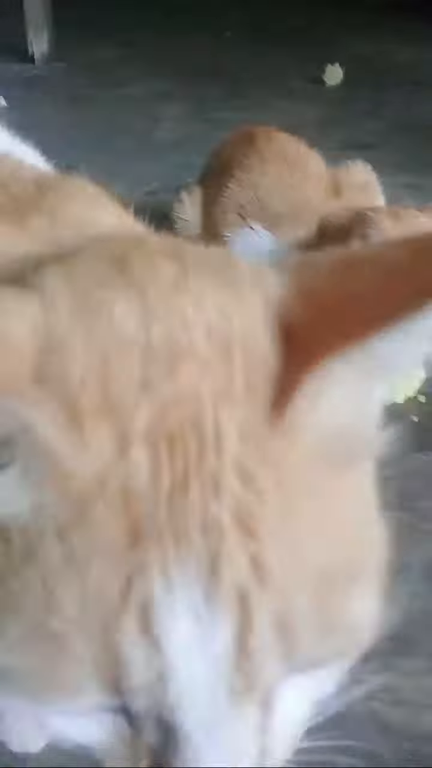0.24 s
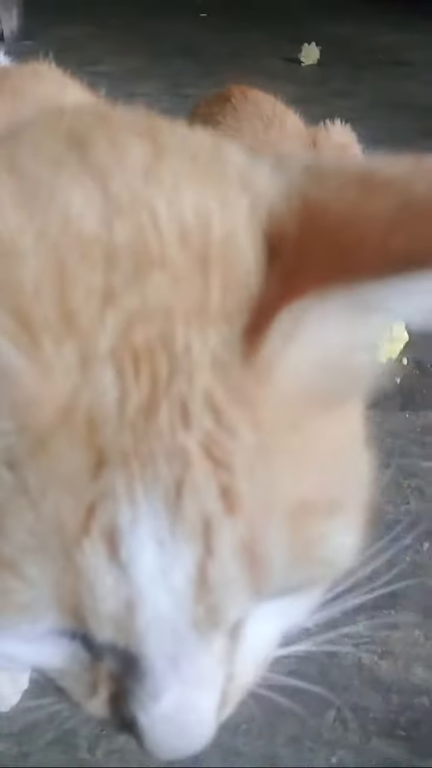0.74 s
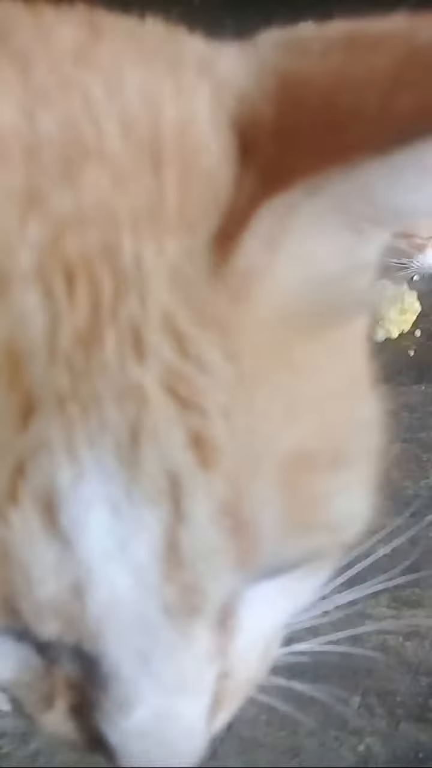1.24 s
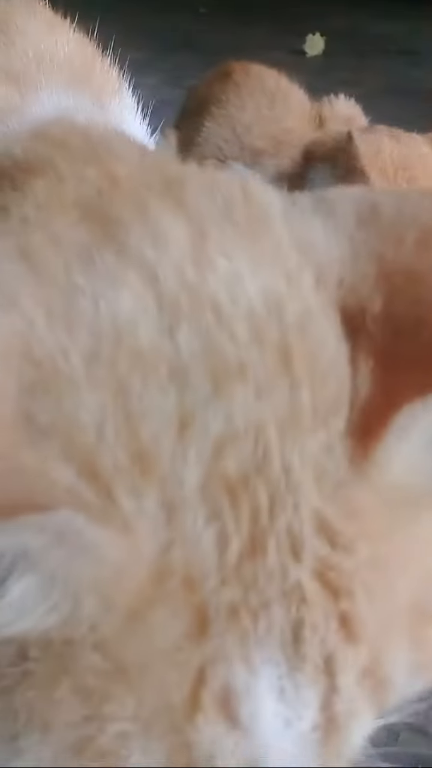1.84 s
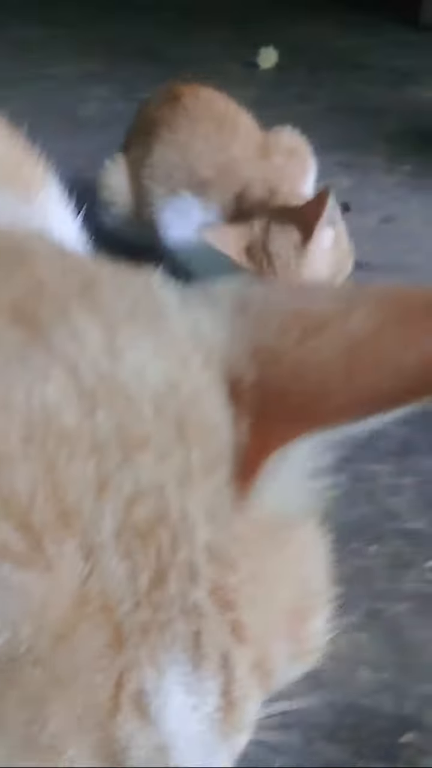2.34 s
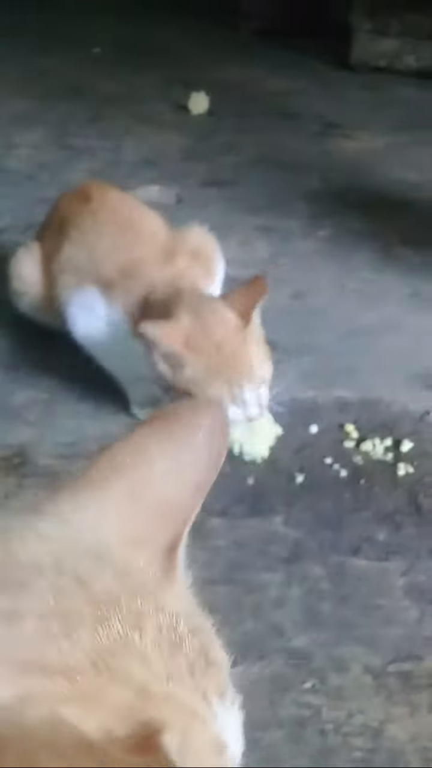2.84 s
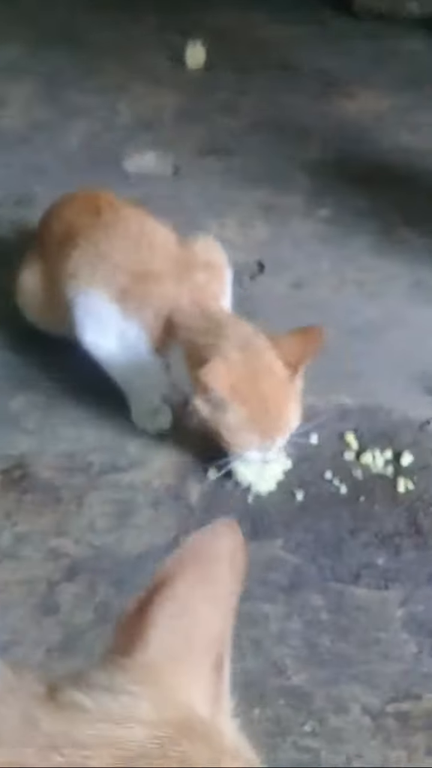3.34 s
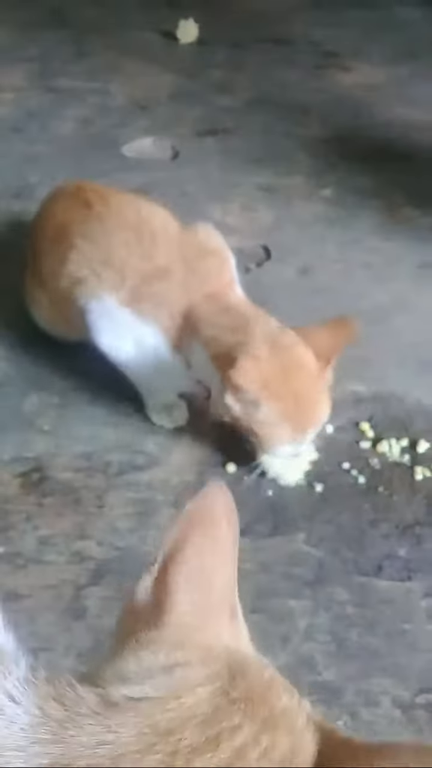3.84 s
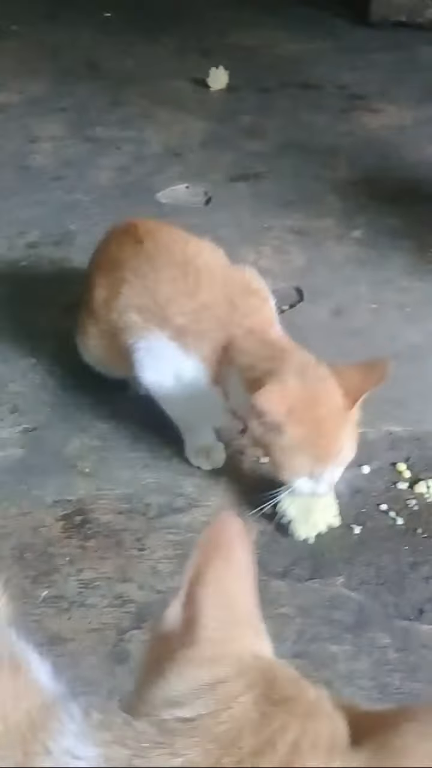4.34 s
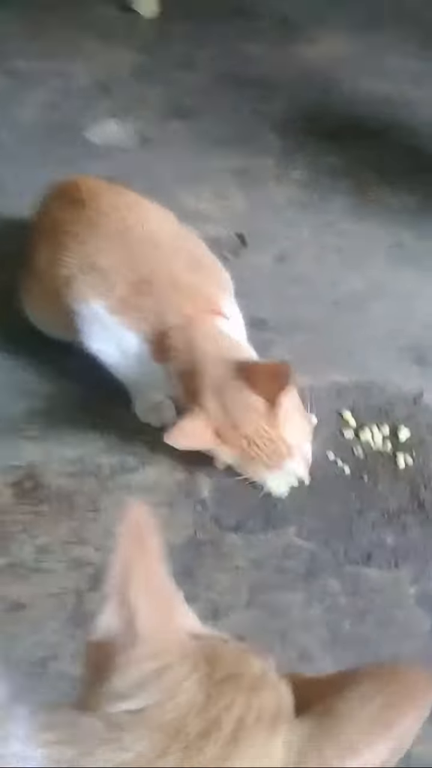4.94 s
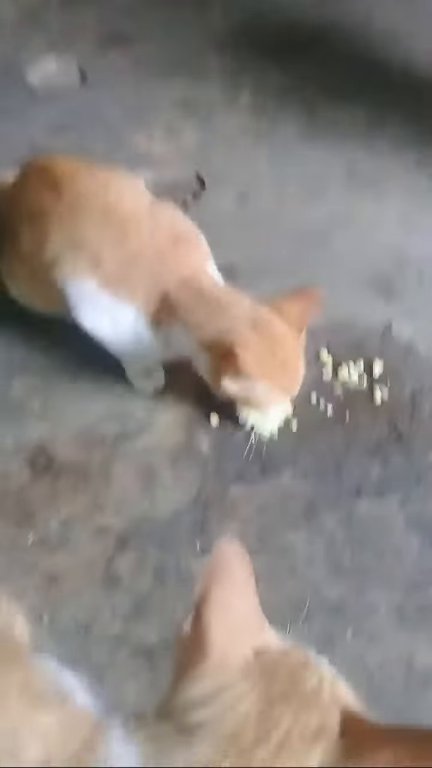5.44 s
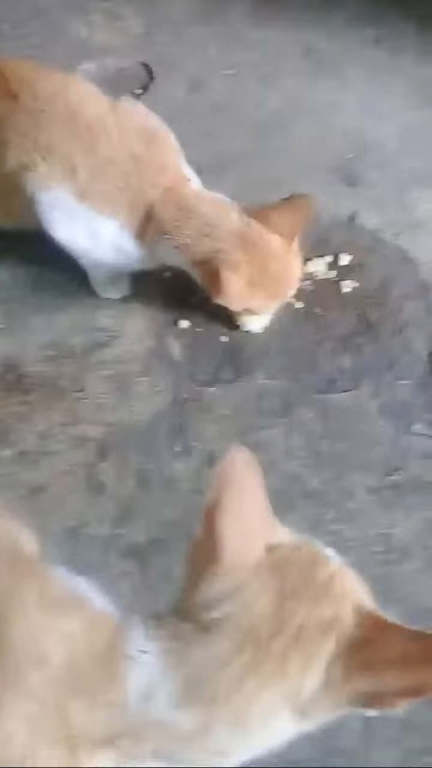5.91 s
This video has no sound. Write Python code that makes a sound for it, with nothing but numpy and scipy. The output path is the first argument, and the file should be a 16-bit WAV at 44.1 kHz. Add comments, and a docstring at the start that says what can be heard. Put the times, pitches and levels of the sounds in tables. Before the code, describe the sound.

A cat very close by gives one long, low, closed-mouth growl that slowly climbs, roughens and turns into a deep ragged snarl, with tiny clicks.

```python
"""A cat's growl, long, low and very close, is aimed at another cat that eats on a concrete floor.
Periodic fold beats and their partials make a closed-mouth hum that climbs in pitch and turns ragged.
Shaped turbulence adds rasp and wheezes; short decaying bursts make a lip smack, clicks and faint chewing.
Strokes of filtered noise make a brush of fur, over a quiet steady hiss and a low rumble."""
import sys
import numpy as np
from scipy import signal
from scipy.fft import rfft, irfft, next_fast_len
from scipy.io import wavfile
from scipy.ndimage import map_coordinates

SR = 44100
rng = np.random.default_rng(int(sys.argv[2]) if len(sys.argv) > 2 else 0)


def waveform_to_disk(signal):
    """Save audio, clipped to [-1, 1], as 16-bit WAV at the path in sys.argv[1]."""
    frames = np.transpose(np.atleast_2d(signal))
    scaled = np.clip(frames, -1, 1) * 32767
    samples = np.round(scaled).astype(np.int16)
    wavfile.write(sys.argv[1], SR, samples)


N = 272097  # length in samples

# pitch of the strongest partial, twice the beat of the vocal folds: [t/s, f/Hz]
HUM_PITCH = [(0, 97), (.12, 96.1), (.65, 110.4), (.98, 113), (1.16, 116.6), (1.84, 123), (2.5, 126.5),
             (3.09, 128.3), (3.4, 123.8), (3.6, 124.6), (3.8, 122), (4.0, 128), (4.2, 129), (4.5, 121.5),
             (4.7, 125.5), (4.95, 126.5), (5.05, 130.6), (5.57, 132), (5.9, 133.5), (6.17, 131.5)]
# the hum swells and eases with the push of the chest: [t/s, level/dB before catches and shimmer]
HUM_LEVEL = [(0, -35), (.12, -31.5), (.26, -37.5), (1.04, -37.8), (1.11, -31.5), (1.18, -29), (1.36, -33.5),
             (1.63, -30), (1.73, -33.5), (2.16, -39), (2.28, -32), (2.92, -35), (3.19, -29.5),
             (3.35, -33.5), (3.44, -31.5), (3.65, -35), (3.8, -33.5), (3.92, -38), (4.1, -34),
             (4.22, -36.5), (4.54, -36), (4.7, -30.5), (4.92, -34.5), (5.04, -28), (5.15, -31.5),
             (5.37, -25.5), (5.57, -31), (5.7, -31), (5.8, -36), (6.17, -35.5)]
# the voice catches, so the hum dips and turns ragged: [t/s, depth/dB, half length/s]
CATCHES = [(.375, 3, .025), (.525, 9, .018), (1.955, 3, .025), (2.539, 5, .032), (4.449, 10, .025),
           (4.843, 9, .04), (5.612, 8, .015), (5.667, 15, .018), (5.735, 9, .015)]
# the growl presses ever harder: [t/s, rasp level/dB, throat rattle reference level/dB, fold beat level/dB]
EFFORT = [(.09, -72, -52.5, -66), (.43, -75.5, -54, -69), (.95, -73, -48.5, -65), (1.18, -71.5, -52, -60),
          (1.75, -66.8, -49, -61.5), (2.04, -68.5, -47, -67), (2.33, -68, -50, -63),
          (2.46, -63.5, -47.5, -53.5), (2.75, -63, -49.5, -58), (2.99, -59.5, -48.5, -64),
          (3.52, -60, -48, -61.5), (4.2, -55.5, -45.5, -56), (4.59, -54.3, -46, -52),
          (5.0, -50.8, -41.7, -52), (5.44, -49.3, -41, -55), (5.9, -46.5, -41.5, -42.5),
          (6.15, -44.3, -41.5, -41)]
SMOOTH_DB, ROUGH_PER_DB = -30.5, 0.02  # a weaker hum than this gets rougher, by so much per dB
# roughness 0-1: at the least, gained by the end, added by the deep voice
ROUGH_BASE, ROUGH_GROWS, ROUGH_DEEP = 0.027, .16, 0.08
OVERTONES_DB, RATTLE_NOISE_DB = 1.2, -2.0  # relative to the throat rattle reference


def growl():
    """Self-sustained oscillation: slack folds beat about 60 times a second, strongest in partial two."""
    progress, _, deep = growl_controls()
    pitch, = curves(HUM_PITCH)
    _, rattle_db, beat_db = curves(EFFORT)
    catch_db = sum(db * swell(s, half) for s, db, half in CATCHES)
    hum_db = curves(HUM_LEVEL)[0] - catch_db
    weakness_db = np.maximum(SMOOTH_DB - hum_db, 0)
    rough = ROUGH_BASE + ROUGH_GROWS * progress + ROUGH_DEEP * deep + ROUGH_PER_DB * weakness_db
    rough = np.clip(rough, .01, 1)
    cycles = np.cumsum(pitch / 2) / SR
    phase = 2 * np.pi * cycles  # of the fold beat
    wander = WANDER + WANDER_PER_ROUGH * rough
    voiced = amp(hum_db) * hum(phase, rough) + amp(beat_db) * fold_beat(phase, deep)
    throat = amp(OVERTONES_DB) * overtones(phase, wander) + amp(RATTLE_NOISE_DB) * rattle(cycles, rough)
    return voiced + singing(phase, wander) + amp(rattle_db + 1.3 * wobble(25)) * throat


# the mouth parts slowly, then wide: [t/s, opening 0-1]
MOUTH_OPENING = [(2.0, 0), (2.9, .07), (3.2, .13), (3.75, .2), (4.3, .2), (4.62, .1), (4.9, .35),
                 (5.25, .62), (5.6, .78), (6.05, .86), (6.16, 1)]
DEEP_S, DEEP_FADE_S = 5.62, .06  # late on the voice breaks into a deep, ragged growl: when, how fast


def growl_controls():
    """Slow control of the source: progress, mouth opening and share of the deep voice, each 0-1."""
    t = np.arange(N) / SR
    opening = np.clip(curves(MOUTH_OPENING)[0], 0, 1)
    deep = .5 + .5 * np.tanh((t - DEEP_S) / (2 * DEEP_FADE_S))
    return t / t[-1], opening, deep


# the throat damps the lowest flutter: [f/Hz, level/dB]
FLUTTER_COLOUR = [(40, -28), (72, -14), (93, 2), (112, 1.5), (142, -3), (158, .5), (220, -3)]
SHIMMER_DB, SHIMMER_PER_S = 1.15, 20  # the hum's strength trembles, more in a rough voice: depth, rate


def hum(phase, rough):
    """Modulation sidebands: alternating strong and weak beats make the second partial flutter."""
    limp = phase / 2 + 1.2 * wobble(6)  # beats pair up, roughly
    flutter = 0.65 * np.sin(2 * phase - limp) + 0.32 * np.sin(2 * phase + limp)
    flutter = flutter + .9 * wobble(65) * np.cos(2 * phase)
    flutter = coloured(flutter, FLUTTER_COLOUR)
    shimmer_db = SHIMMER_DB * unit(rough) * wobble(SHIMMER_PER_S)
    tone = (np.sin(2 * phase) + rough * flutter) / np.sqrt(1 + rough ** 2)
    return np.sqrt(2) * amp(shimmer_db) * tone


# share of the fold beat that comes and goes until the deep voice locks in; how fast
BEAT_LOOSE, BEAT_STUTTER_PER_S = .55, 15


def fold_beat(phase, deep):
    """Partial coherence: the fundamental mixes a steady sine with one of random amplitude and phase."""
    loose = np.clip(BEAT_LOOSE * (1 - deep), .02, 1)
    stutter = wobble(BEAT_STUTTER_PER_S) * np.sin(phase) + wobble(BEAT_STUTTER_PER_S) * np.cos(phase)
    return np.sqrt(2 * (1 - loose)) * np.sin(phase) + np.sqrt(loose) * stutter


# uneven folds put some partials between the harmonics: [multiple of the beat, level/dB before OVERTONES_DB]
OVERTONES = [(2.5, -12), (3, -8.5), (3.5, -15), (4, -12), (4.26, -8.5), (5, -14), (6, -18), (6.8, -23)]
WANDER, WANDER_PER_ROUGH = .45, 2.4  # phase wander of the overtones (radians), wider in a rough voice


def overtones(phase, wander):
    """Inharmonic partials: uneven vibration makes each waver in level and phase."""
    return sum(amp(db + 3 * wobble(9)) * np.sin(k * phase + wander * wobble(15)) for k, db in OVERTONES)


# single overtones sing out of the rattle: [t/s, half length/s, multiple of the beat, level/dB]
OVERTONE_SWELLS = [(.2, .09, 4.1, -54), (.86, .06, 3.05, -52), (1.0, .14, 4.1, -50), (1.45, .25, 4.05, -54),
                   (2.0, .28, 3, -49.5), (2.27, .08, 5.1, -52), (2.48, .04, 5.3, -51),
                   (2.88, .36, 4.27, -51), (3.5, .12, 3, -52), (3.75, .12, 4.2, -51),
                   (4.18, .12, 4.27, -48), (5.08, .13, 3, -47), (5.15, .18, 6, -55), (5.38, .13, 4.24, -47),
                   (5.72, .14, 4.3, -50), (5.95, .17, 3.04, -47), (5.97, .12, 3.55, -47)]


def singing(phase, wander):
    """Selective reinforcement: single partials swell and fade, with less phase wander."""
    out = np.zeros(N)
    for s, half, k, db in OVERTONE_SWELLS:
        out += amp(db) * swell(s, half) * np.sin(k * phase + .55 * wander * wobble(9))
    return np.sqrt(2) * out


# resonant colour of the throat: [f/Hz, level/dB]
THROAT = [(70, -43), (140, -9), (165, 1), (190, 2.5), (255, 0), (300, -5.5), (350, -7), (430, -17),
          (510, -16), (620, -30.5), (900, -42), (2000, -60)]


def rattle(cycles, rough):
    """Source and filter: fold closings and turbulent air both excite the throat."""
    pulses = unit(fold_pulses(cycles, rough, jitter=.0022, scatter_db=1.5))
    return unit(0.8 * unit(coloured(pulses, THROAT)) + noise(THROAT))


def fold_pulses(cycles, rough, jitter, scatter_db):
    """Jitter and shimmer: one pulse per closing, uneven in time (seconds) and size."""
    at = np.flatnonzero(np.diff(np.floor(cycles)) > 0)
    late, size = rng.standard_normal((1024, 2))[:len(at)].T
    when = at + late * jitter * SR * np.sqrt(rough[at])
    when = np.clip(when, 0, N - 1).astype(int)
    return np.bincount(when, amp(scatter_db * size), N)


# colour of the air with the mouth shut: [f/Hz, level/dB]
MOUTH_SHUT = [(250, -21.5), (450, 8), (620, 5.5), (780, 7), (950, -.5), (1100, -1), (1300, -3), (1600, 3),
              (1900, 1.5), (2150, -5.5), (2600, -15.5), (3200, -36), (4500, -39.5), (8000, -49)]
# colour of the air with the mouth open: [f/Hz, level/dB]
MOUTH_OPEN = [(200, -9), (330, 11.5), (440, 8.5), (610, -2), (790, 1), (1000, 1), (1230, -0.5), (1600, 1.5),
              (1950, 3.5), (2200, -5.5), (3050, -9), (3600, -16.5), (4400, -23), (5500, -36.5), (8000, -50)]
# narrow resonances that colour the rasp: [f/Hz, width/Hz, lift/dB]
RASP_RINGS = [(431, 28, 4), (505, 30, 5), (680, 40, 3), (788, 26, 4.5), (1214, 45, 2.5), (1587, 70, 2.5),
              (1929, 30, 3.5)]
# air hisses past the cat's teeth: [f/Hz, level/dB]
SPIT = [(1200, -25), (2600, 0), (3300, -1), (4400, -5), (5500, -16), (9000, -30)]
SPIT_DB, SPIT_POWER = -16, 11  # under the rasp with the mouth wide open; how steeply it grows


def rasp():
    """Turbulence through resonances: air tears through the throat, brighter as the mouth opens."""
    _, opening, _ = growl_controls()
    air = np.sqrt(1 - opening) * noise(MOUTH_SHUT) + np.sqrt(opening) * noise(MOUTH_OPEN)
    hz = np.geomspace(200, 4000, 600)
    lift_db = sum(db / (1 + (2 * (hz - centre) / width) ** 2) for centre, width, db in RASP_RINGS)
    air = unit(coloured(air, np.column_stack([hz, lift_db])))
    air = air + amp(SPIT_DB) * opening ** SPIT_POWER * noise(SPIT)
    return amp(curves(EFFORT)[0] + 0.8 * wobble(11.0) + 1.3 * wobble(130)) * air


# the tight throat whistles or hisses: [t/s, half length/s, f/Hz, phase wobble rate/(1/s), level/dB]
WHEEZES = [(1.26, .11, 500, 12, -61.5), (1.92, .09, 1750, 450, -72.5), (2.92, .04, 490, 110, -54),
           (3.16, .06, 1800, 400, -63), (5.84, .04, 840, 90, -53), (5.95, .15, 436, 25, -52)]


def wheezes():
    """Resonance of a narrow passage: a brief tone, spread into a hiss by fast phase wobble."""
    t, out = np.arange(N) / SR, np.zeros(N)
    for s, half, hz, rate, db in WHEEZES:
        tone = np.sqrt(2) * np.sin(2 * np.pi * hz * t + 1.1 * wobble(rate))
        out += amp(db) * swell(s, half) * tone
    return out


# a quick run of ticks: [t/s, peak level/dB]
SMACK_TICKS = [(.8332, -49.5), (.8375, -60), (.8462, -53.5), (.858, -57.5), (.8662, -59.5), (.875, -64),
               (.882, -66)]
# colour of the wet mouth: [f/Hz, level/dB]
SMACK_COLOUR = [(900, -32), (1700, -13), (2100, -5), (2550, -4), (2850, 3), (3100, -5), (3450, -20),
                (3900, -12), (4400, -27), (6000, -38), (10000, -50)]


def smack():
    """Impulse response of the mouth: wet lips part in a fading run of crackling ticks."""
    out, t = np.zeros(N), np.arange(SR // 10) / SR
    for s, db in SMACK_TICKS:
        blow = (t == 0) + .08 * rng.standard_normal(len(t)) * amp(-60 * t / .016)
        tick = coloured(blow, SMACK_COLOUR)
        add(out, s, amp(db) * tick / np.abs(tick).max())
    return out


# sharp clicks close by: [t/s, peak level/dB, knock level/dB relative to the snap, t60/s]
CLICKS = [(4.1762, -22.8, -11, 0.002), (4.1825, -41, -9, .014), (4.7706, -27.5, 6, 0.005),
          (4.7736, -25.5, 6, 0.005), (4.7748, -35, -2, .005)]
# colour of the sharp snap: [f/Hz, level/dB]
SNAP = [(500, -28), (1500, -8.5), (1950, -6), (2300, 4), (2600, 2), (2900, -2), (3450, 1.5), (3850, -2),
        (4500, -1), (5300, -17), (6200, -4.5), (7200, -22), (8700, -29.5), (11200, -9.5), (12500, -22.5),
        (15500, -28.5)]
# colour of the duller body knock: [f/Hz, level/dB]
KNOCK = [(200, -4), (550, -5), (900, 3), (1800, -0.5), (2300, -9), (4500, -20), (7200, -24.5),
         (9300, -18.5), (15500, -30)]


def clicks():
    """Impact excitation: an impulse with a short crackle drives a sharp snap and a duller knock."""
    out, t = np.zeros(N), np.arange(SR // 10) / SR
    for s, db, knock_db, t60 in CLICKS:
        blow = (t == 0) + .09 * rng.standard_normal(len(t)) * amp(-60 * t / t60)
        click = unit(coloured(blow, SNAP)) + amp(knock_db) * unit(coloured(blow, KNOCK))
        add(out, s, amp(db) * click / np.abs(click).max())
    return out


# chewing, crumbs and small mouth noises: [t/s, onset level/dB, centre f/Hz, width/octaves, t60/s]
CHEWS = [(.055, -77, 4000, .2, .25), (.834, -66, 3950, .07, .04), (.836, -70, 2700, .22, .38),
         (1.248, -75, 3000, .5, .08), (2.528, -50, 1800, .13, .04), (2.528, -66, 3500, .45, .02),
         (2.53, -73.5, 3500, .52, .38), (2.535, -71, 7200, .27, .24), (2.618, -57, 1450, .25, .14),
         (2.875, -51, 1890, .14, .03), (2.882, -53, 620, .6, .3), (3.431, -71, 4500, .7, .097),
         (3.705, -68.5, 5200, .55, .039), (3.76, -74, 4800, .45, .049), (4.025, -76, 10000, .25, .15),
         (4.805, -64.5, 4200, .22, .3), (6.012, -71, 5440, .22, .17)]


def chewing():
    """Band-limited decay: soft food gives small bursts of crackle, each in its own band."""
    out, t = np.zeros(N), np.arange(SR // 4) / SR
    # [widths from the centre, level/dB]
    skirt = [(-6, -55), (-3, -22), (-1, -7), (0, 0), (1, -8), (3, -26), (6, -60)]
    for s, db, hz, width, t60 in CHEWS:
        grains = rng.standard_normal(len(t)) * amp(3.8 * rng.standard_normal(len(t)))
        band = [(hz * 2 ** (k * width), level) for k, level in skirt]
        add(out, s, amp(db - 60 * t / t60) * unit(coloured(grains, band)))
    return out


# fur brushes close by: [t/s, level/dB, rise/s, fade t60/s, brightness/(dB per octave)]
STROKES = [(4.8, -66, .06, 1.0, 0), (5.025, -68, .02, .6, 2), (5.13, -64.5, .11, 1.2, -1.5),
           (5.22, -70, .05, .7, 0), (5.42, -65.5, .05, 1.3, 3)]
# colour of rubbed fur before the brightness tilt: [f/Hz, level/dB]
HAIRS = [(1500, -13), (3000, 3), (4400, -1.5), (5400, -2.5), (6200, -8), (7300, -10), (9000, -6.5),
         (11000, -8), (15500, -14)]


def fur():
    """Friction noise: fur rubs by in overlapping strokes of soft hiss, each with its own brightness."""
    t, out = np.arange(N) / SR, np.zeros(N)
    for s, db, rise, t60, tilt_db in STROKES:
        fade = amp(db - 60 * np.maximum(t - s, 0) / t60)
        envelope = fade * np.where(t < s, swell(s, rise), 1)
        hairs = [(hz, level + tilt_db * np.log2(hz / HAIRS[0][0])) for hz, level in HAIRS]
        out += envelope * noise(hairs)
    return out * amp(.6 * wobble(45))


# decay of the room: [f/Hz, t60/s]
ROOM = [(100, 0.24), (2000, 0.22), (6000, .13), (12000, 0.18)]


def room(x):
    """Diffuse reverberation: floor and walls answer with noise that decays at its own rate per band."""
    hz, t, z = signal.stft(rng.standard_normal(SR // 2), SR, nperseg=256)
    decay = amp(-60 * t / along(ROOM, hz)[:, None])
    tail = signal.istft(z * decay, SR, nperseg=256)[1]
    return signal.fftconvolve(x, tail / np.linalg.norm(tail))[:N]


# colour of the steady hiss: [f/Hz, level/dB]
FLOOR = [(1650, -34), (2800, -6), (3420, -6), (5300, -2), (5730, -4), (7680, -4), (8310, -2.5), (10500, -1),
         (15500, -0.5)]


def hiss():
    """Stationary noise: a steady, mostly treble background."""
    return amp(-76) * noise(FLOOR)


def rumble():
    """Stationary noise: a steady background weighted to the bass."""
    colour = [(20, -10), (60, -5.5), (300, -17), (600, -25), (1100, -21.5), (3000, -26.5), (8000, -65)]
    return amp(-75.5) * noise(colour)


def amp(db):
    """Logarithmic level: decibels to gain."""
    return 10 ** (np.asarray(db) / 20)


def unit(x):
    """Mean power: scale to rms 1."""
    return x / np.sqrt(np.mean(x ** 2) + 1e-20)


def along(points, hz):
    """Logarithmic frequency: interpolate (f/Hz, value) points on a log axis."""
    f, v = np.transpose(points)
    return np.interp(np.log(hz + 1), np.log(f + 1), v)


def curves(rows):
    """Linear interpolation: one value per sample for each column after the time."""
    s, *cols = np.transpose(rows)
    return [np.interp(np.arange(N) / SR, s, c) for c in cols]


def swell(s, half):
    """Gaussian envelope: peaks at time s and falls to 1/e after half seconds."""
    return np.exp(-((np.arange(N) / SR - s) / half) ** 2)


def wobble(rate):
    """Slow random modulation: a smooth curve of rms 1 with rate knots a second."""
    return unit(map_coordinates(rng.standard_normal(4096), [np.arange(N) * rate / SR], mode="wrap"))


def coloured(x, points):
    """Minimum-phase filtering: a causal filter with the given (f/Hz, level/dB) shape."""
    size = 8192
    gain = amp(along(points, np.fft.rfftfreq(size, 1 / SR)))
    cepstrum = irfft(np.log(gain + 1e-6))
    # folding the cepstrum onto positive time makes the filter causal
    cepstrum[1:size // 2] *= 2
    cepstrum[size // 2 + 1:] = 0
    return signal.fftconvolve(x, irfft(np.exp(rfft(cepstrum))))[:len(x)]


def noise(points):
    """Spectral shaping: coloured noise of rms 1."""
    return unit(coloured(rng.standard_normal(N), points))


def add(track, s, sound):
    """Superposition: mix a sound into the track at time s."""
    part = track[round(s * SR):][:len(sound)]
    part += sound[:len(part)]


def scene():
    """Superposition: the growl in front, small noises in the room, and a steady background."""
    voice = growl() + rasp() + wheezes()
    small = smack() + clicks() + chewing()
    return (voice + small + amp(-20) * room(small) + fur() + hiss() + rumble())[None]


TOP_HZ = 15750  # band limit


def record(dry):
    """Band limitation: nothing is kept at or above the top frequency."""
    size = next_fast_len(N + SR // 2)
    keep = np.fft.rfftfreq(size, 1 / SR) < TOP_HZ
    return irfft(rfft(dry, size) * keep, size)[:, :N]


dry = scene()
out = record(dry)
waveform_to_disk(out)
```